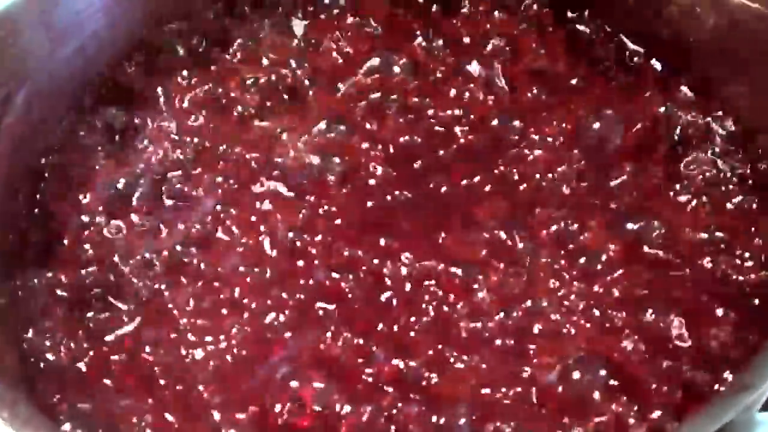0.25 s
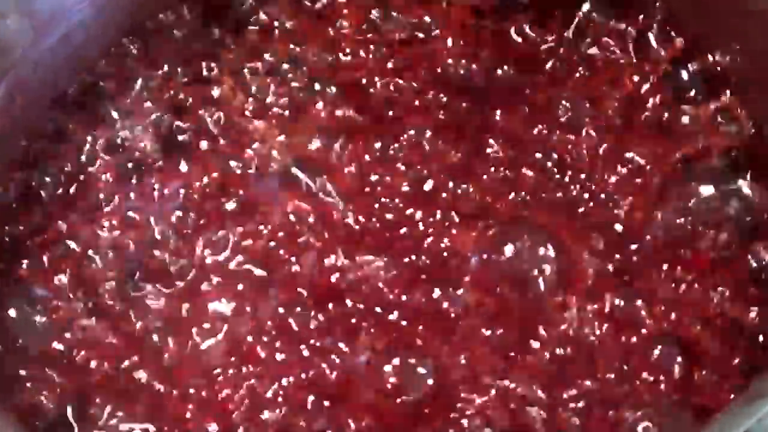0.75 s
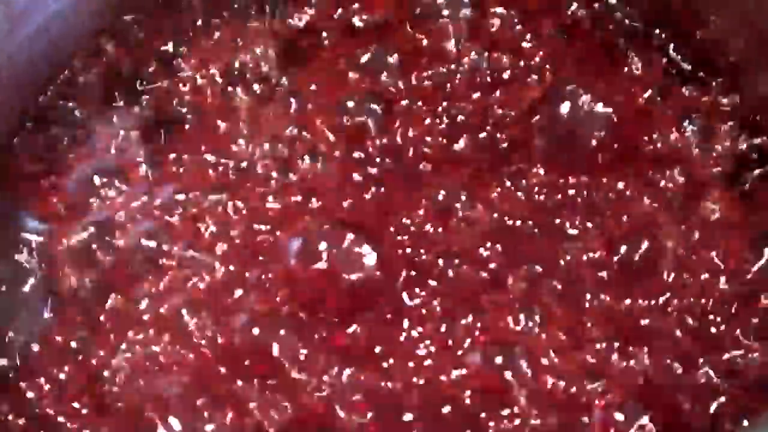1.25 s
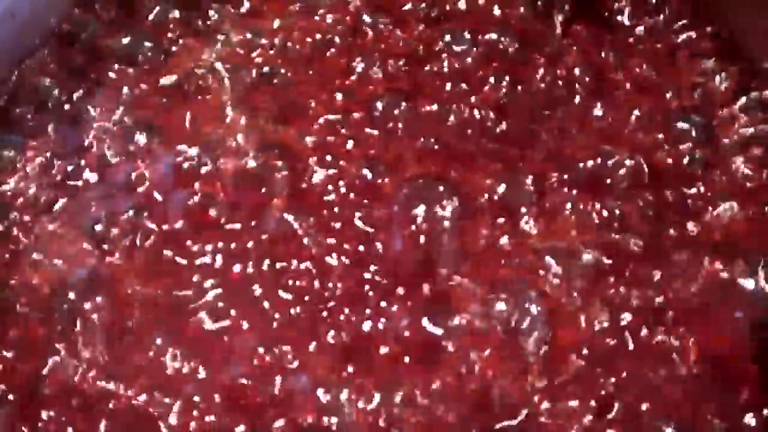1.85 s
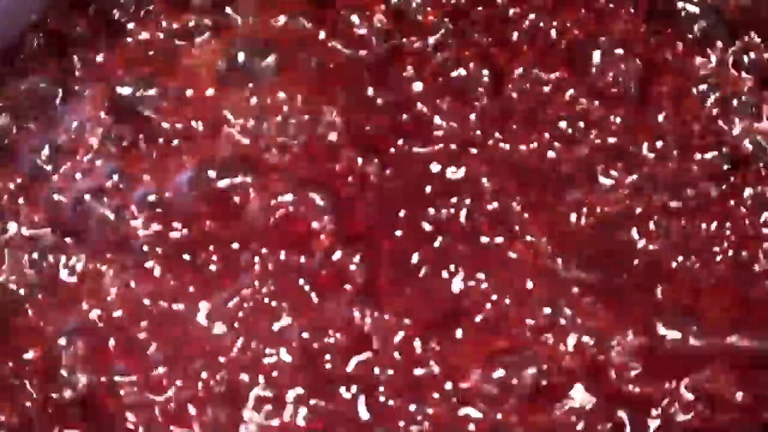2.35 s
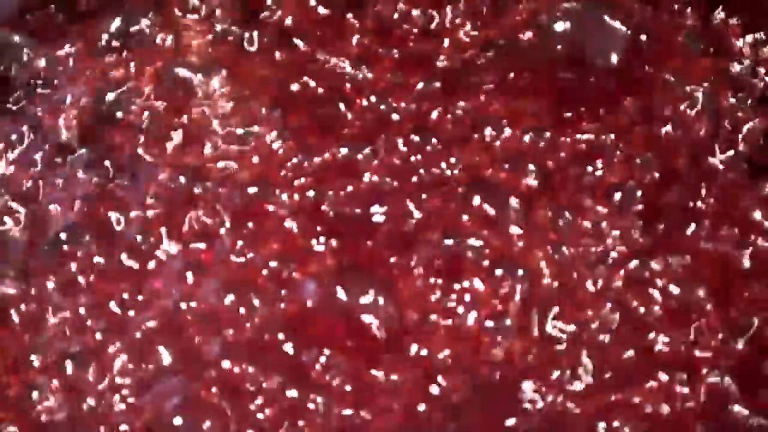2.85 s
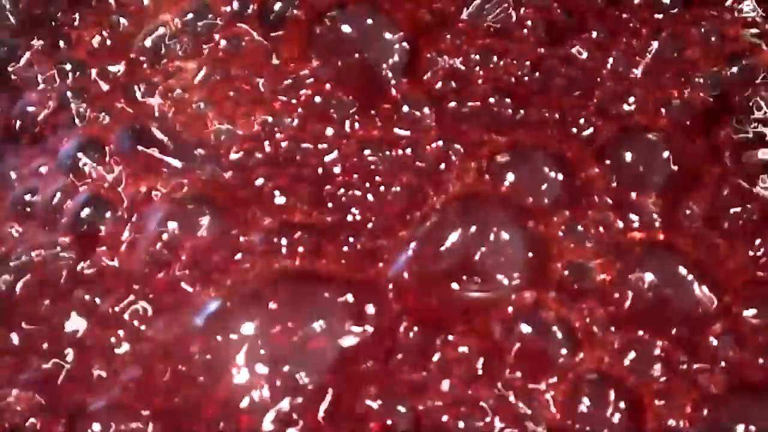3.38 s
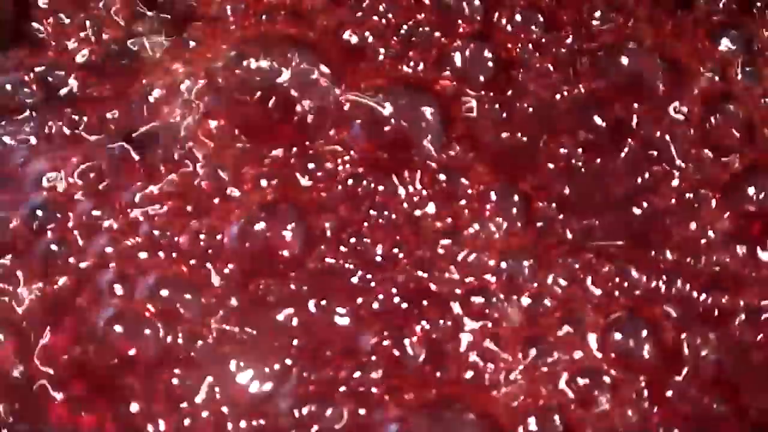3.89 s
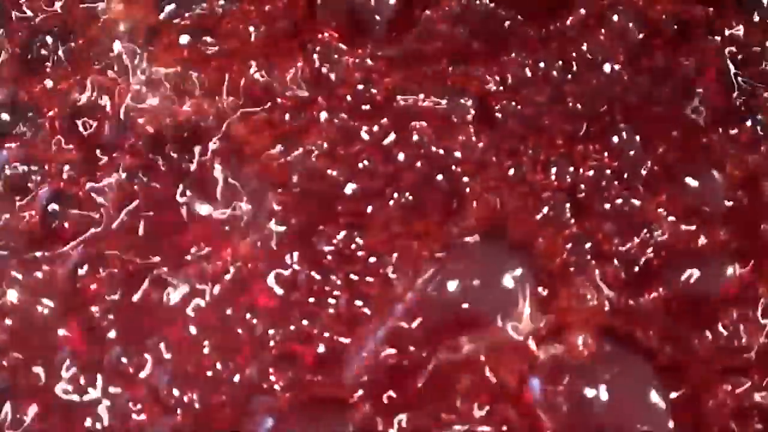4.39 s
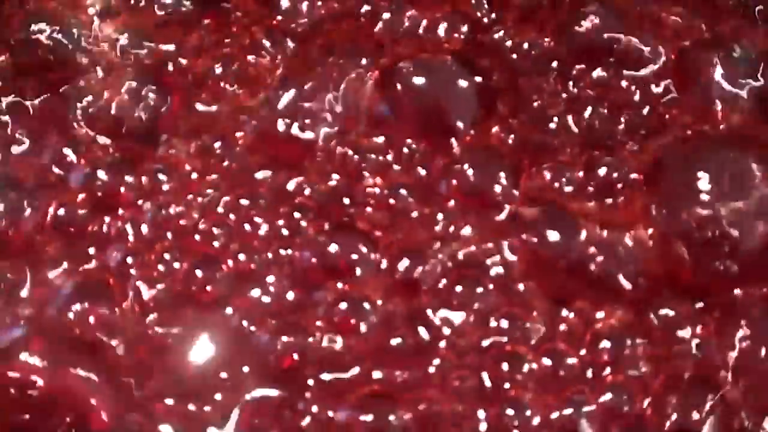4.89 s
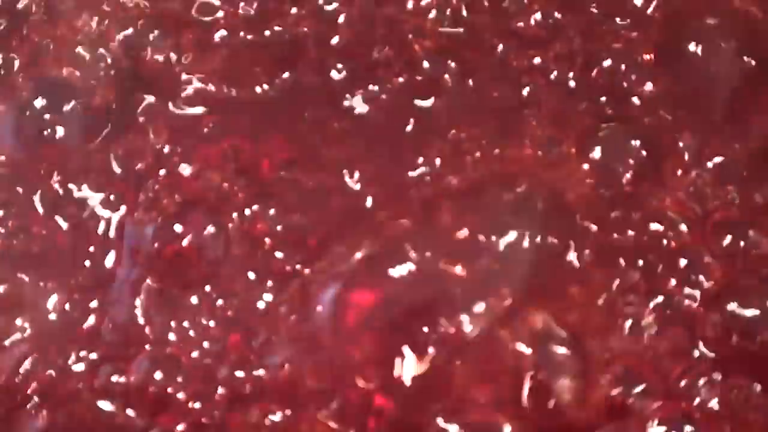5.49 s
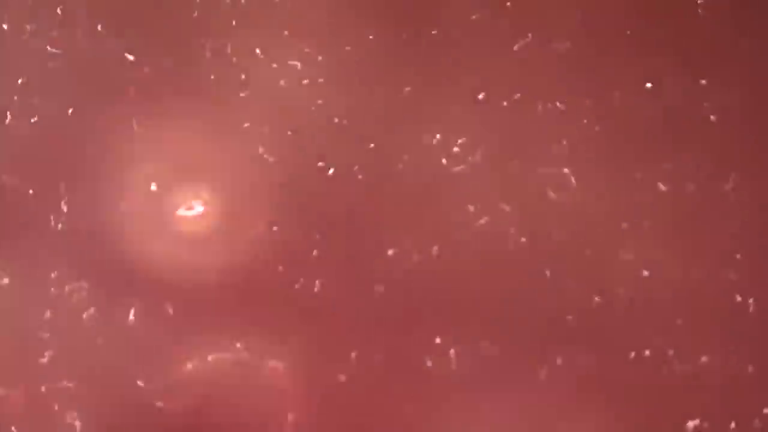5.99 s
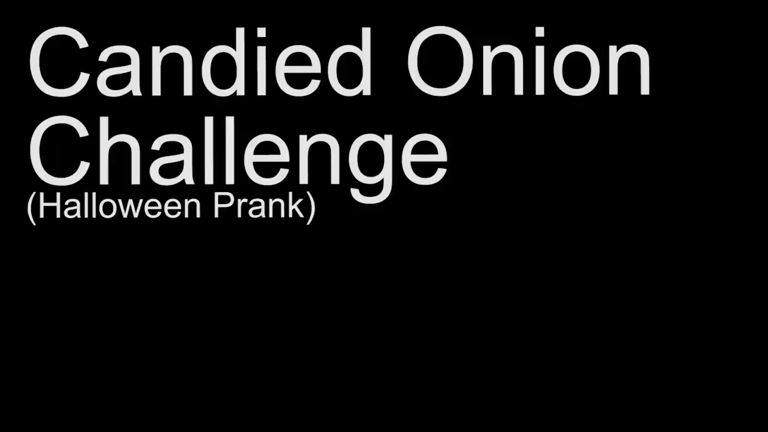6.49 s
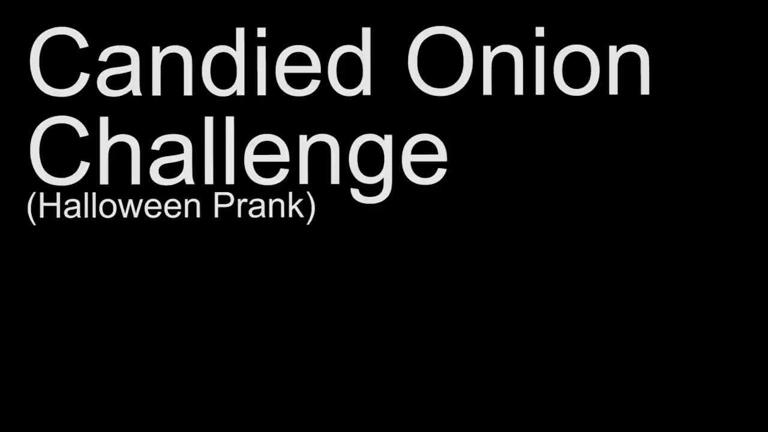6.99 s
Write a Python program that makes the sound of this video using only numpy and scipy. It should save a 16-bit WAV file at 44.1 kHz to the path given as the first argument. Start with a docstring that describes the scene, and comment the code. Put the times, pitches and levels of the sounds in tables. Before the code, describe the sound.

From 0 seconds, thick sugar syrup boils hard in a steel saucepan, heard closely from above. The froth is a continuous, clumpy crackle and bright fizz: thousands of very short, ringing wet bursts, strongest in the high range, with a thin steam hiss. Beneath lie a soft, fluttering low gas flame rush and a faint wavering motor hum. Larger bubbles snap sharply at irregular moments, one clearly near 0.6, more from 1.1 to 2.8, with occasional lower, softer plips. Brief rushes of crackle thicken the boil around 1.7, 3.2 and 4.6. The microphone keeps nearing, slowly at first, so the froth becomes louder and fuller; snaps crowd together from 4.7 to 6.4, especially around 6.0. The kitchen adds only a short, faint reverberation, and bubbles spread slightly around the centre. At about 6.5 everything cuts dead, leaving silence to the end, just after 7 seconds.

```python
"""In a kitchen, thick candy syrup boils hard in a steel saucepan on a gas stove, heard from just above the pan.
The froth is thousands of tiny ringing bursts in clumps; larger bubbles snap or plip out of it as single rings.
Filters give the bursts the colour of froth and pan; they grow louder and fuller as the microphone nears.
Filtered noise makes the rush of the burner, wavering sines the motor hum, a short noise tail the room."""
import sys
import numpy as np
from scipy import signal
from scipy.fft import rfft, irfft
from scipy.io import wavfile

SR = 44100
rng = np.random.default_rng(int(sys.argv[2]) if len(sys.argv) > 2 else 0)


def dump(signal):
    """Clip the signal to [-1, 1] and save it as 16-bit WAV at the path in sys.argv[1]."""
    limited = np.clip(np.atleast_2d(signal).T, -1, 1)
    pcm = np.round(limited * 32767).astype(np.int16)
    wavfile.write(sys.argv[1], SR, pcm)


N = 319279
TIME = np.arange(N) / SR  # s
STOP_S = 6.524  # everything is silent from here on
EDGE_HZ = 16000  # upper band limit

# broad colour of the froth: (frequency [Hz], relative gain [dB])
FROTH_COLOUR = [(250, -14.5), (600, -9.5), (1250, -10.5), (1800, -7.5), (2400, -9), (4000, -5.5),
                (6000, -1.5), (8000, 6), (9500, -1.5), (12000, -4.5), (15500, -9.5)]
# air resonances between syrup and pan walls: (frequency [Hz], width [Hz], lift or cut [dB])
PAN_RESONANCES = [(895, 160, 4.5), (1656, 290, 3.5), (2064, 330, 3.5), (2880, 760, 6), (3680, 280, 3),
                  (4340, 420, 4.5), (5520, 420, 3.5), (6800, 450, 1), (8200, 690, -2)]
# colour of the steam escaping from the froth: (frequency [Hz], relative gain [dB])
STEAM_COLOUR = [(1000, -6.5), (4000, 16.5), (8000, 0), (11000, -9.5), (15500, 4)]
# brief changes of the froth's level, mostly rushes of crackle: (time [s], change [dB])
FROTH_CHANGES = [(1.59, 0), (1.71, 3.5), (3.19, 2.5), (3.28, 3), (4.56, 2.5), (4.93, -1), (5.10, 2),
                 (5.28, 2.5), (5.48, 2.5), (5.999, 2), (6.21, 2.5)]
# single bursting bubbles at set times, loud snaps and some softer, lower plips:
# (time [s], level before colouring [dB], pitch [Hz], length [cycles])
SET_POPS = [(0.0834, -15, 9000, 1.8), (0.6211, -5, 6300, 1.15), (1.1444, -10, 9100, 1.6),
            (1.366, -11, 8400, 1.7), (1.8395, -11, 6900, 2.0), (1.933, -10, 7300, 2.8),
            (2.1392, -6, 8200, 2.4), (2.3633, -7.5, 4700, 0.98), (2.4218, -8.5, 8160, 3.0),
            (2.5387, -9, 6900, 2.1), (2.6613, -8, 8470, 3.7), (2.7784, -16, 4130, 3.1),
            (3.1322, -8, 5600, 2.85), (3.2238, -10, 5960, 2.7), (3.2727, -11, 5500, 1),
            (3.3052, -6, 7260, 2.2), (3.4269, -10, 7160, 2.6), (3.6722, -10, 8900, 1.6),
            (3.8919, -13, 7650, 2.2), (3.9235, -10, 7900, 1.3), (4.0615, -9.5, 7740, 2.7),
            (4.3715, -10, 8600, 1.8), (4.4141, -11, 6100, 3.0), (4.5743, -9, 7800, 2.2),
            (4.6831, -6.5, 8400, 2.3), (4.6951, -8.5, 7200, 1.7), (4.771, -6.5, 7700, 3.4),
            (4.7878, -5.5, 8600, 1.3), (4.8671, -16.5, 3770, 2.6), (4.9229, -2.5, 7800, 1),
            (4.9399, -6, 8340, 2.0), (5.1434, -9, 7540, 2.4), (5.2393, -6.5, 8400, 2.2),
            (5.2582, -3, 6200, 1.4), (5.3129, -13.5, 4280, 3.1), (5.374, -7.5, 7400, 2.9),
            (5.4139, -5.5, 7800, 1.1), (5.4202, -5.5, 8520, 2), (5.5176, -9, 8100, 3.0),
            (5.5317, -7.5, 7290, 3.5), (5.6467, -9.5, 6990, 2.2), (5.6986, -5.5, 7660, 1.6),
            (5.7705, -5, 7400, 2), (5.9095, -4.5, 8000, 2.6), (6.0072, -4, 7500, 2.3),
            (6.0375, -4.5, 7820, 2.4), (6.0485, -4.5, 8800, 1.6), (6.0719, -3.5, 7600, 1.3),
            (6.3423, -5, 8100, 1.6), (6.4173, -8.5, 5420, 2.5), (6.4352, -6.5, 6700, 3.5)]
# more pops at random times:
# (rate [1/s], lowest pitch [Hz], highest pitch [Hz], level above the fizz setting [dB], spread either way [dB])
RANDOM_POPS = [(15, 5600, 9800, 19.5, 1.7), (7, 2700, 5700, 14, 1.5)]
# colour of the gas flame: (frequency [Hz], relative gain [dB])
FLAME_COLOUR = [(20, -15.5), (42, -37), (62, -10), (85, -17), (105, -0.5), (150, 0), (250, 1), (410, 1),
                (560, -4), (800, -8.5), (1400, -18), (4000, -25)]
# motor hum: (frequency [Hz], rms level [dB], waver [share of level; also radians of phase])
HUM_TONES = [(59, -70, .3), (120.4, -54, .12), (207.7, -58.5, 0.87)]
# strength of the kitchen's reverberation: (frequency [Hz], gain against the direct sound [dB])
ROOM_COLOUR = [(60, -6.5), (125, -20), (400, -15), (1100, -17), (2200, -24.5), (4500, -11.5), (8000, -12.5),
               (13000, -34)]
# stereo width: (frequency [Hz], gain of the left-right difference [dB])
STEREO_WIDTH = [(100, -5.5), (400, 1), (1200, 1), (1850, -15.5), (2800, -11.5), (3600, -5.5), (7000, -3.5),
                (9500, 2), (13000, -4)]

# froth settings at the start and their rise by STOP_S
CRACKLE_DB, CRACKLE_RISE_DB = -38, 7.5  # middle-sized bubbles
FIZZ_DB, FIZZ_RISE_DB = -33, 5.0  # the smallest bubbles
NEARING_POWER = 2.01  # above 1: slow at first, quicker towards the end
CHANGE_S, CHANGE_FIZZ_SHARE = .03, 0.47  # time to fall to 1/e of the change; share of it in the fizz
MAX_PLACE = .18  # how far off centre a bubble may sit, of 1


def amp(db):
    """Decibels to gain."""
    return 10 ** (np.asarray(db) / 20)


def unit(x):
    """Scales to an rms of one."""
    return x / np.sqrt(np.mean(x ** 2) + 1e-20)


def read(points, hz):
    """Joins (frequency [Hz], value) points on a log-frequency axis."""
    f, value = np.transpose(points)
    return np.interp(np.log(hz + 1), np.log(f + 1), value)


def drift(rate_hz):
    """Smooth random wander of rms one, changing up to about rate_hz times a second."""
    hz = np.fft.rfftfreq(N, 1 / SR)
    spectrum = rfft(rng.standard_normal(N))
    return unit(irfft(spectrum / (1 + (hz / rate_hz) ** 2), N))


def colour(x, db_at, size=4096):
    """Minimum-phase filter with the gain db_at(Hz): clicks ring after the blow, never before."""
    hz = abs(np.fft.fftfreq(size, 1 / SR))
    log_gain = np.log(amp(db_at(hz)))
    taps = np.fft.ifft(np.exp(np.conj(signal.hilbert(log_gain)))).real
    return signal.oaconvolve(x, taps[None, :size // 2], axes=1)[:, :N]


def placed(mono, place):
    """Left and right of a sound at place -1 (right) to 1 (left)."""
    return np.array([mono * (1 + place), mono * (1 - place)])


def nearness(s):
    """How far the microphone has closed in on the pan: 0 at the start, 1 at STOP_S."""
    return np.clip(s / STOP_S, 0, 1) ** NEARING_POWER


def pan_db(hz):
    """The froth's colour with the pan's air resonances on top."""
    lifts = [db / (1 + (2 * (hz - f) / width) ** 2) for f, width, db in PAN_RESONANCES]
    return read(FROTH_COLOUR, hz) + sum(lifts)


def burst(hz, cycles, order=3, size=768, echo_db=-8.5, echo_t60=0.017, apart=0.43):
    """A film tears: the cavity rings for a few cycles, then the sound scatters briefly between the pan walls."""
    t = TIME[:size]
    age = t * hz / cycles  # the ring is strongest at age 1
    envelope = (age * np.exp(1 - age)) ** order
    ring = envelope * np.sin(2 * np.pi * (t * hz + rng.random()))
    # nearly alike left and right
    scatter = rng.standard_normal(size) + apart * rng.standard_normal((2, size))
    scatter = scatter * np.exp(-np.log(1000) * t / echo_t60)
    echo = signal.fftconvolve(ring[None], scatter, axes=1)[:, :size]
    return ring + amp(echo_db) * ring.std() * unit(echo)


def swarm(clumps, low_hz, high_hz, per_s, cycles, spread_db, largest, count=36):
    """Many bubbles of random size, pitch and place, bursting more often inside a clump."""
    chance = per_s / count / SR * clumps / clumps.mean()  # per sample and pitch
    places = rng.uniform(-MAX_PLACE, MAX_PLACE, N)
    out = np.zeros((2, N))
    for hz in np.geomspace(low_hz, high_hz, count):
        length = cycles * 2 ** rng.uniform(-0.55, 0.35)
        ring = unit(burst(hz, length)) * np.sqrt(hz)
        draw = rng.random(N) / chance
        at = np.flatnonzero(draw < 1)
        size = amp(spread_db * np.minimum(-np.log(draw[at]), largest))  # many small, few large
        clicks = np.zeros((2, N))
        clicks[:, at] = placed(size, places[at])
        out += signal.oaconvolve(clicks, ring, axes=1)[:, :N]
    return unit(colour(out, pan_db))


def froth():
    """Clumped bursts form crackle, rounder plips, fizz and thin ticks; escaping steam adds a faint hiss."""
    clumps = amp(2.3 * drift(220) + 1.1 * drift(35))
    crackle = swarm(clumps, low_hz=324.0, high_hz=4940, per_s=4300, cycles=0.92, spread_db=3.0, largest=4.2)
    plips = swarm(clumps, low_hz=1500, high_hz=6500, per_s=340, cycles=4, spread_db=5.6, largest=3.0)
    fizz = swarm(clumps, low_hz=5000, high_hz=10200, per_s=1250, cycles=2.4, spread_db=5.9, largest=3.0)
    ticks = swarm(clumps, low_hz=9500, high_hz=15500, per_s=1100, cycles=2.0, spread_db=5.6, largest=4)
    hiss = rng.standard_normal((1, N))
    steam = amp(-18) * unit(colour(hiss, lambda hz: read(STEAM_COLOUR, hz)))

    change_db = sum(db * np.exp(-((TIME - s) / CHANGE_S) ** 2) for s, db in FROTH_CHANGES)
    crackle_db = CRACKLE_DB + CRACKLE_RISE_DB * nearness(TIME) + change_db
    fizz_db = FIZZ_DB + FIZZ_RISE_DB * nearness(TIME) + CHANGE_FIZZ_SHARE * change_db
    fizz_db = fizz_db + 0.32 * drift(5)
    middle = amp(crackle_db) * (amp(0.5) * crackle + amp(-5.0) * plips)
    small = amp(fizz_db) * (amp(-1.7) * fizz + amp(-8.0) * ticks + steam)
    return middle + small


def random_pops():
    """Random bubbles in rows like those of SET_POPS; their level rises with the fizz as the microphone nears."""
    rows = []
    for per_s, low_hz, high_hz, above_db, spread_db in RANDOM_POPS:
        for when, size, pitch, length in rng.random((round(per_s * STOP_S), 4)):
            s = when * STOP_S
            fizz_db = FIZZ_DB + FIZZ_RISE_DB * nearness(s)
            db = fizz_db + above_db + spread_db * (2 * size - 1)
            rows.append((s, db, low_hz * (high_hz / low_hz) ** pitch, 1 + 2 * length))
    return rows


def pops(count=3):
    """Single ringing bubbles, each with a few softer neighbours tearing within milliseconds of it."""
    out = np.zeros((2, N))
    for s, db, hz, cycles in list(SET_POPS) + random_pops():
        lag_s, ratio = rng.uniform([-.001, .35], [.004, 1.35], (count, 2)).T
        neighbours = [(s + lag, db - 12, hz * r, 1.2) for lag, r in zip(lag_s, ratio)]
        place = rng.uniform(-MAX_PLACE, MAX_PLACE)
        for at, level_db, pitch_hz, length in [(s, db, hz, cycles)] + neighbours:
            ring = amp(level_db) * burst(pitch_hz, length) * placed(0.86, place)[:, None]
            start = max(round((at - length / pitch_hz) * SR), 0)  # the ring peaks at its time
            out[:, start:][:, :ring.shape[1]] += ring
    # a brighter top for a sharp snap: (frequency [Hz], gain [dB])
    snap = [(400, -3.5), (1200, 2.5), (3000, -2.0), (9000, 1.0), (12000, 6.5), (15500, 9.5)]
    return colour(out, lambda hz: read(snap, hz))


def burner():
    """The low rush of the gas flame: coloured noise whose level flutters."""
    noise = rng.standard_normal((1, N))
    rush = unit(colour(noise, lambda hz: read(FLAME_COLOUR, hz)))
    return amp(-45.0 + 0.9 * drift(5.6)) * rush


def hum():
    """Steady motor tones that waver in level and phase."""
    out = np.zeros(N)
    for hz, db, waver in HUM_TONES:
        level = 1 + waver * drift(3.9)
        tone = np.sin(2 * np.pi * hz * TIME + waver * drift(1.7))
        out += amp(db) * unit(level * tone)
    return out


def kitchen(x, t60=.4, gap_s=0.011):
    """A short diffuse tail from hard kitchen surfaces, different on each side."""
    t = TIME[:SR // 2]
    tail = rng.standard_normal((2, len(t))) * np.exp(-np.log(1000) * t / t60) * (t > gap_s)
    wet = signal.oaconvolve(x, tail / np.linalg.norm(tail[0]), axes=1)[:, :N]
    return colour(wet, lambda hz: read(ROOM_COLOUR, hz))


def scene():
    """The pan sits close and central, with the kitchen faint around it."""
    near = froth() + pops() + burner() + hum()
    left, right = near + kitchen(near)
    mid = (left + right) / 2
    side = colour((left - right)[None] / 2, lambda hz: read(STEREO_WIDTH, hz))[0]
    return np.array([mid + side, mid - side]) * amp([[-.15], [.1]])  # left, right balance in dB


def record(dry):
    """Cuts the sound dead at STOP_S, then limits the band to EDGE_HZ."""
    lowpass = signal.firwin(401, EDGE_HZ, window=("kaiser", 9), fs=SR)
    return signal.oaconvolve(dry * (TIME < STOP_S), lowpass[None], "same")


dry = scene()
out = record(dry)
dump(out)
```